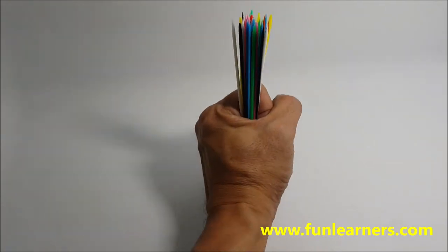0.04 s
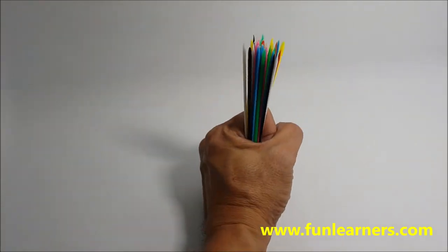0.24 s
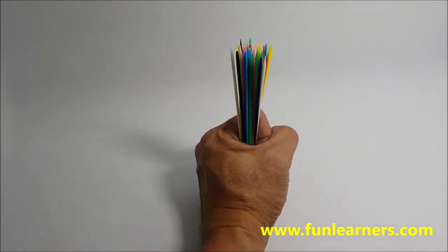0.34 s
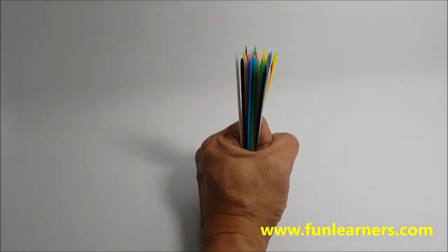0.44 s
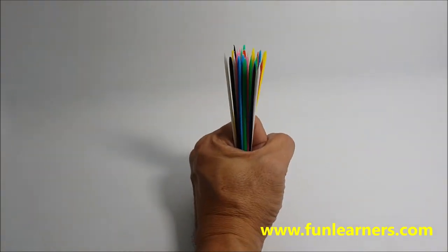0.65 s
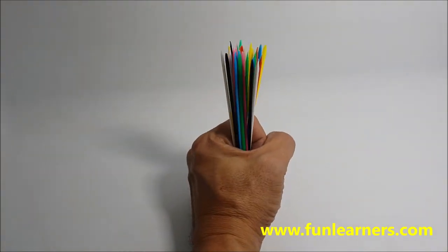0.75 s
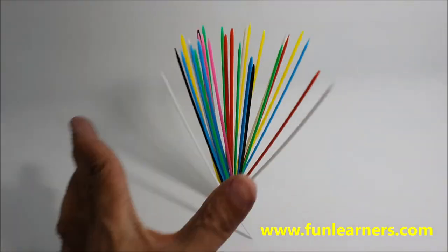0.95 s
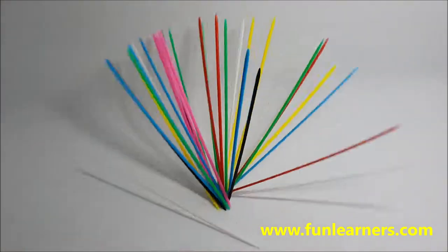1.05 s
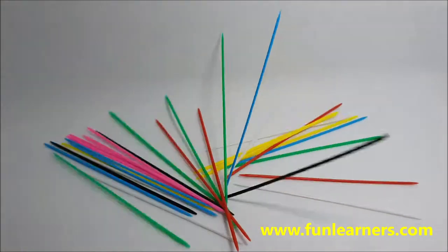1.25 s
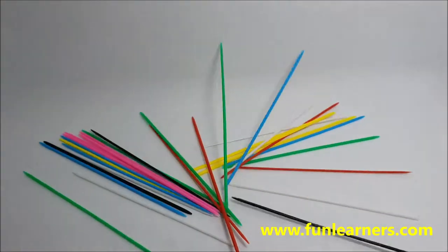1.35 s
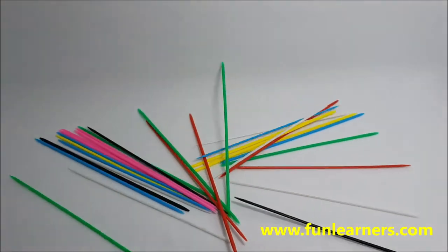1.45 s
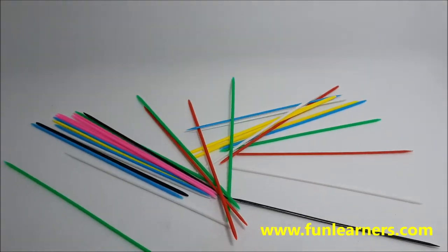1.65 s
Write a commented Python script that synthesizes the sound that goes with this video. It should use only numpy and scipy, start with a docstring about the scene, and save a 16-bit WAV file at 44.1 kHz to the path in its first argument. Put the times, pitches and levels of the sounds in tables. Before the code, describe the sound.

A bundle of thin sticks rattles and thuds onto a table at about 0.2 seconds. Around 0.8 seconds a hand loosens with a soft rub and a few light knocks. From 1.1 seconds the sticks topple in a bright clatter, with late drops and bounces until about 1.6 seconds. Everything is close, in a small room with a short echo and a faint low hum.

```python
"""A fist sets a bundle of pick-up sticks down on a table: the top thuds and the stick ends rattle.
Then the grip loosens, skin rubs on wood, and the sticks slide apart with a few soft knocks.
Just after one second they topple and clatter, each hit a crack and a brief ring of the bending stick.
A few late ones drop and bounce. All along, a small room adds a short echo and a low mains hum."""
import sys
import numpy as np
from scipy import signal
from scipy.fft import rfft, irfft
from scipy.io import wavfile

SR = 44100
rng = np.random.default_rng(int(sys.argv[2]) if len(sys.argv) > 2 else 0)


def unload_audio(sound):
    """Save the sound as a 16-bit wav file, at the path given as the first command line argument."""
    columns = np.transpose(np.atleast_2d(sound))
    # keep every value between -1 and 1, then stretch to whole-number steps
    steps = np.round(np.clip(columns, -1, 1) * 32767)
    wavfile.write(sys.argv[1], SR, steps.astype(np.int16))


N = 74970  # 1.7 seconds
BASS_EDGE_HZ = 794  # above this, left and right drift apart and brightness tilts take hold


def amp(db):
    """Turns decibels into a number to multiply by."""
    return 10 ** (np.asarray(db) / 20)


def unit(x):
    """Scales a sound to an average energy of 1 per channel."""
    return x / np.sqrt(np.sum(x ** 2) / len(np.atleast_2d(x)) + 1e-20)


def value_at(points, hz):
    """Looks up a value between rows of (Hz, value), on a scale of octaves."""
    row_hz, value = np.transpose(points)
    return np.interp(np.log(hz + 1), np.log(row_hz + 1), value)


def level(points):
    """A volume curve through rows of (seconds, dB), silent before and after them."""
    return amp(np.interp(np.arange(N) / SR, *np.transpose(points), left=-np.inf, right=-np.inf))


def add(mix, start_s, sound):
    """Mixes a sound in at its start time, cutting off what does not fit."""
    at = round(start_s * SR)
    sound = sound[..., max(-at, 0):]
    part = mix[:, max(at, 0):][:, :sound.shape[-1]]
    part += sound[..., :part.shape[1]]


def colour(x, tone, tilt_db=0, size=2048):
    """Shapes a sound with rows of (Hz, relative dB); tilt_db brightens it by that much per octave."""
    hz = abs(np.fft.fftfreq(size, 1 / SR))
    octaves = np.log2(np.maximum(hz, BASS_EDGE_HZ) / SR)
    log_gain = np.log(amp(value_at(tone, hz) + tilt_db * octaves))
    response = np.exp(np.conj(signal.hilbert(log_gain)))  # rings only after a hit, never before
    taps = np.fft.ifft(response).real[:size // 2]
    return signal.fftconvolve(x, unit(taps)[None], axes=1)[:, :x.shape[1]]


def noise(count, treble_likeness=0.12):
    """Stereo noise, alike on both sides in the bass and less so in the treble."""
    left, other = rfft(rng.standard_normal((2, count)))
    hz = np.fft.rfftfreq(count, 1 / SR)
    likeness = np.clip(treble_likeness + (1 - treble_likeness) / (1 + (hz / BASS_EDGE_HZ) ** 2), 0, 1)
    right = likeness * left + np.sqrt(1 - likeness ** 2) * other
    return irfft(np.array([left, right]), count)


def panned(x, pan_db):
    """Makes the left side louder than the right by pan_db."""
    return x * amp([[pan_db / 2], [-pan_db / 2]])


def grains(per_s, spread_db):
    """Tiny impacts at random times, each reaching the two sides with its own strength."""
    strength = amp(spread_db * np.minimum(rng.exponential(1, N), 3))
    impacts = noise(N) * strength * (rng.random(N) < per_s / SR)
    return unit(impacts) * np.sqrt(N)


# The tone of the room's air. Each row: frequency in Hz, relative level in dB.
AIR_TONE = [(20, -22), (70, -9), (105, -6), (195, -10), (275, -27.5), (380, -16), (520, -27.5), (1290, -28),
            (2500, -47.5), (5000, -53), (16000, -62.5)]
# The notes in the mains hum. Each row: frequency in Hz, level in dB.
HUM_NOTES = [(48.7, -38), (97, -59), (145.5, -66.5)]
# The hum starts a little louder, then settles. Each row: time in seconds, boost in dB.
HUM_BOOST = [(0, 4), (.4, 2.5), (.7, 0), (1.7, 0)]

def background(air_db=-48):
    """Dull room air and a low mains hum."""
    t = np.arange(N) / SR
    hum = sum(amp(db) * np.sqrt(2) * np.sin(2 * np.pi * (hz * t + rng.random())) for hz, db in HUM_NOTES)
    air = amp(air_db) * colour(noise(N), AIR_TONE)
    return panned(hum * level(HUM_BOOST) + air, pan_db=1.0)


# How long the room rings. Each row: frequency in Hz, seconds to fade by 60 dB.
ECHO_FADE = [(200, 0.4), (530, 0.29), (1400, 0.3225), (4200, 0.28), (9700, 0.1562), (16000, 0.22)]
# The tone of the echo. Each row: frequency in Hz, relative level in dB.
ECHO_TONE = [(100, -21.5), (215, -19.5), (300, -8.5), (480, -0.5), (1500, -4), (3200, -3.5), (4500, -.5),
             (7000, -1), (15000, -0.5)]

def room_echo(x, early_db=-7, early_fade_s=0.036, tail_db=-8.5, count=24000):
    """Sound bounces quickly off table and wall, then dies away in a short tail."""
    hz, frame_s, spectrum = signal.stft(noise(count), SR, nperseg=256)
    fade = amp(-60 * frame_s / value_at(ECHO_FADE, hz)[:, None])
    tail = signal.istft(spectrum * fade, SR, nperseg=256)[1][:, :count]
    t = np.arange(count) / SR
    early = noise(count) * amp(-60 * t / early_fade_s) * (t > .003)
    echo = amp(tail_db) * unit(tail * np.minimum(t / 0.006, 1)) + amp(early_db) * unit(early)
    return signal.fftconvolve(x, colour(echo, ECHO_TONE), axes=1)[:, :N]


# Skin catching and slipping as the grip loosens. Each row: time in seconds, level in dB.
GRIP_LEVEL = [(.793, -79.5), (.8, -48), (.81, -46), (.815, -38), (.83, -46.5), (.84, -80), (.87, -75)]
# Sticks sliding against the hand and each other.
# Each row: start in seconds, length in seconds, level in dB, brightness in dB per octave.
STICK_SLIDES = [(-.04, 0.12, -53, -4.5), (0.011, 0.044, -49, 3), (0.135, 0.079, -62, 2),
                (0.815, 0.11, -48, 3), (0.937, 0.12, -57.5, -3.5)]
# The tones of the grip and of the slides. Each row: frequency in Hz, relative level in dB.
GRIP_TONE = [(100, -5), (350, -8), (550, 2.5), (1700, -0.5), (2350, 1), (2800, -28.5), (4700, -20.5),
             (6500, -32), (16000, -36.5)]
SLIDE_TONE = [(100, 9.5), (500, 6.5), (1500, 8), (3200, 3.5), (4500, 8), (6000, 0), (13000, -1.5),
              (16000, 8)]

def hand_rubbing():
    """Skin and sticks move in many tiny slips, which blur into a soft grainy hiss."""
    out = colour(grains(per_s=3400, spread_db=4) * level(GRIP_LEVEL), GRIP_TONE)
    for start_s, length_s, db, tilt_db in STICK_SLIDES:
        swell = np.sin(np.pi * np.arange(0, 1, 1 / (length_s * SR)))
        rub = colour(grains(per_s=3200, spread_db=-4.5), SLIDE_TONE, tilt_db)
        add(out, start_s, amp(db) * swell * rub[:, :len(swell)])
    return panned(out, pan_db=-5.0)


# The notes the table top rings at. Each row: frequency in Hz, level in dB, seconds to fade by 60 dB.
TABLE_NOTES = [(62, -22, 0.12), (118.7, -14.5, 0.28), (176, -19, 0.092), (211.2, 5, 0.085),
               (258, -11.5, .08), (345.6, -16.5, 0.041), (404.4, -11.5, .09), (523, -9, 0.11),
               (606, -10.5, 0.13), (770, -13, 0.038), (950, -4.5, 0.02), (1027, -7, .06)]
# Blows on the table. Each row: start in seconds, level in dB, contact time in milliseconds,
# pitch multiplier (the pitch shifts as the load on the table changes).
TABLE_BLOWS = [(0.0286, -24, 2.45, 0.93), (0.2136, -13, 1, 0.9), (0.2225, -14, 1.15, 0.83),
               (0.236, -9, 0.91, 1), (0.2517, -19.5, 1.1, 1), (.2600, -9.5, 1.9, .99),
               (0.307, -15.5, 3.3, 0.977), (0.8531, -36, 0.95, 0.99), (1.161, -29, 0.77, 1),
               (1.182, -27.5, 0.72, 0.85), (1.2835, -36, 2.4, 0.92), (1.4083, -35, 0.65, 0.75),
               (1.504, -43, 0.6, 0.67), (1.579, -47, 0.49, 0.95)]

def table_thuds(count=12000):
    """The fist and the heavier sticks set the table top ringing; a longer push sounds duller."""
    out = np.zeros((2, N))
    t = np.arange(count) / SR
    for start_s, db, contact_ms, pitch in TABLE_BLOWS:
        ring = sum(amp(note_db - 60 * t / fade_s) * np.sin(2 * np.pi * hz * pitch * t)
                   for hz, note_db, fade_s in TABLE_NOTES)
        push = t * np.exp(-4 * t * 1000 / contact_ms)
        thud = amp(db) * signal.fftconvolve(ring, push / push.sum())[:count]
        add(out, start_s, panned(thud, pan_db=1.7))
    return out


# The notes of a bending stick. Each row: frequency in Hz, relative level in dB, seconds to fade by 60 dB.
STICK_NOTES = [(570, -4.5, 0.017), (1250, -1.5, 0.035), (1640, 3, 0.02), (2180, 6.5, 0.025),
               (2980, -6, 0.0058), (4610, 1.5, 0.027), (4960, -0.5, .02), (8050, 2.5, 0.022),
               (11980, 18.5, 0.025), (14660, -6.5, .01)]

def stick_hit(tone, tilt_db, chatter_fade_s, ring_db, count=4096):
    """One hit: a sharp crack, a fast-dying chatter and the ring of the stick as it bends."""
    crack_db, crack_fade_s, rise_s = 5.5, 0.0017, 0.0011
    t = np.arange(count) / SR
    contact = noise(count) * (amp(-60 * t / chatter_fade_s) + amp(crack_db - 60 * t / crack_fade_s))
    pitches = 1 + 0.049 * rng.uniform(-1.24, 1, len(STICK_NOTES))  # no two sticks ring quite alike
    phases = 2 * np.pi * rng.random((len(STICK_NOTES), 2, 1))
    ring = sum(amp(db - 60 * t / fade_s) * np.sin(2 * np.pi * hz * pitch * t + phase)
               for (hz, db, fade_s), pitch, phase in zip(STICK_NOTES, pitches, phases))
    hit = (unit(contact) + amp(ring_db) * unit(ring)) * np.minimum(t / rise_s, 1)
    return unit(colour(hit, tone, tilt_db))


# Stick ends bumping the table and shifting in the bundle.
# Each row: start in seconds, level in dB, brightness in dB per octave, lean to the left in dB.
BUNDLE_KNOCKS = [(.028, -25, 11.5, 1.5), (0.158, -28.5, 8, -4.5), (0.205, 1.5, -2, -6), (0.2101, 5, 2, -6),
                 (0.2133, 11, -3.7, 0.5), (.2172, 9.5, -7.5, -4.5), (.2255, 12, -2.5, -6.5),
                 (0.2282, 8.5, 7, -4.5), (.235, -1.5, -4, 2.5), (.242, 4, 4, -6), (.249, 0, 5, -1.5),
                 (.258, -3.5, 5, 3), (0.271, -15, -2.5, -8), (0.296, -11.5, 6.5, -4), (0.322, -26, 16, 6),
                 (.852, -20.5, 2.5, 0), (0.9435, -13.5, 0, 1), (.950, -21, -1, -8), (0.9984, -25.5, 0, -6),
                 (1.114, -14.5, -0.5, 1), (1.124, -11, 4, -2.5)]
# The dull tone of those knocks. Each row: frequency in Hz, relative level in dB.
KNOCK_TONE = [(40, 8), (130, -13), (240, -3.5), (400, 1.5), (600, -1), (1000, -2.5), (1400, -2),
              (2200, -5.5), (3200, -11), (4500, -13), (6000, -22), (9500, -29), (12000, -32),
              (16000, -40.5)]

def bundled_sticks():
    """Sticks held together knock dully and hardly ring."""
    out = np.zeros((2, N))
    for start_s, db, tilt_db, pan_db in BUNDLE_KNOCKS:
        knock = stick_hit(KNOCK_TONE, tilt_db, chatter_fade_s=0.048, ring_db=-14)
        add(out, start_s, amp(db) * panned(knock, pan_db))
    return out


# Falling sticks hitting the table and each other.
# Each row: start in seconds, level in dB, brightness in dB per octave, lean to the left in dB.
FALL_CLACKS = [(1.134, 3.5, -0.5, 1.5), (1.137, -6, -1.5, -5), (1.145, -7, 0, -20.5),
               (1.1586, 6.5, 0.2, -1.5), (1.161, -7.5, -4, -11), (1.1677, -2.5, 1, 19), (1.175, -5, -4, 10),
               (1.184, 4, 2, -5), (1.191, 4.5, 1.5, -2), (1.200, -7, -1.5, -5), (1.2255, -1, 2.5, -2.5),
               (1.230, -22, 9, 2), (1.238, -6.5, -1.7, -9), (1.248, -6, -2.5, -2), (1.2755, -6, 0, -2),
               (1.2801, -3, 1, -2), (1.3015, -21.5, -1.5, -18.5), (1.316, -19.5, 1, -13),
               (1.3261, -14, -0.5, 5), (1.338, -16, -6, -9), (1.343, -20.5, 0.5, -1),
               (1.364, -19.5, -1.5, 5), (1.4074, 1, -2.2, -2.5), (1.4096, 2, 2.5, -6.5),
               (1.4142, -11, 4, 2), (1.438, -38, 4, -6), (1.4715, -11, 0.5, -1), (1.484, -32, 4, -5),
               (1.503, -14.5, -11, 2), (1.515, -20, -1, -8), (1.577, -14, 0, -0.5), (1.6129, -18, -2.5, -5)]
# The bright tone of those clacks. Each row: frequency in Hz, relative level in dB.
CLACK_TONE = [(40, -11), (170, 6.5), (380, -0.5), (620, 5.5), (950, 0), (1250, -1), (3200, 0), (4500, 0.5),
              (6200, -5), (9500, -5.5), (12500, -7.5), (16000, -3)]
# Small jostles between the sticks. Each row: time in seconds, level in dB.
JOSTLE_LEVEL = [(1.11, -73), (1.145, -37.5), (1.2, -30), (1.25, -36.5), (1.3, -41), (1.38, -51),
                (1.44, -53), (1.51, -51.5), (1.56, -53), (1.63, -70), (1.68, -93)]

def falling_sticks():
    """Loose sticks clack brightly and ring more; small jostles fill the gaps."""
    out = np.zeros((2, N))
    for start_s, db, tilt_db, pan_db in FALL_CLACKS:
        clack = stick_hit(CLACK_TONE, tilt_db, chatter_fade_s=0.026, ring_db=-7.5)
        add(out, start_s, amp(db) * panned(clack, pan_db))
    jostles = grains(per_s=1600, spread_db=2.5) * level(JOSTLE_LEVEL)
    return out + panned(colour(jostles, CLACK_TONE, tilt_db=-2.0), pan_db=-0.5)


def scene():
    """Table, sticks and hand up close, with the room around them."""
    near = table_thuds() + bundled_sticks() + falling_sticks() + hand_rubbing()
    return near + room_echo(near) + background()


def record(dry, ceiling=0.95, low_cut_hz=47, high_cut_hz=15850):
    """Gently squashes the loudest peaks, then trims the deepest bass and the highest treble."""
    squashed = ceiling * np.tanh(dry / ceiling)
    trimmed = signal.lfilter(*signal.butter(2, low_cut_hz, "high", fs=SR), squashed)
    treble_cut = signal.firwin(301, high_cut_hz, window=("kaiser", 9), fs=SR)
    return signal.oaconvolve(trimmed, treble_cut[None], "same")


dry = scene()
out = record(dry)
unload_audio(out)
```